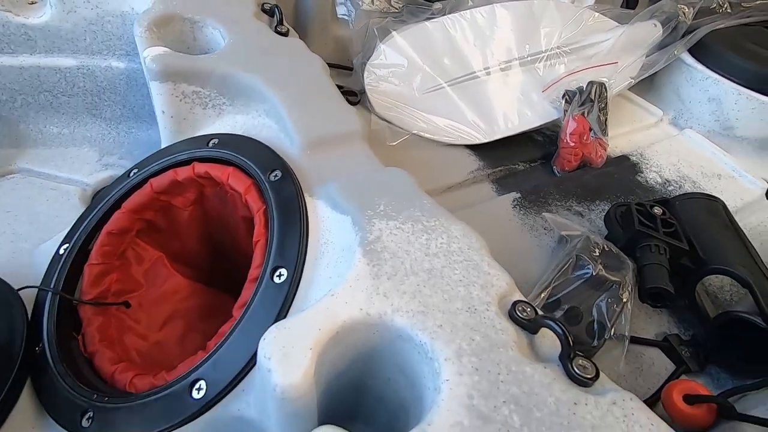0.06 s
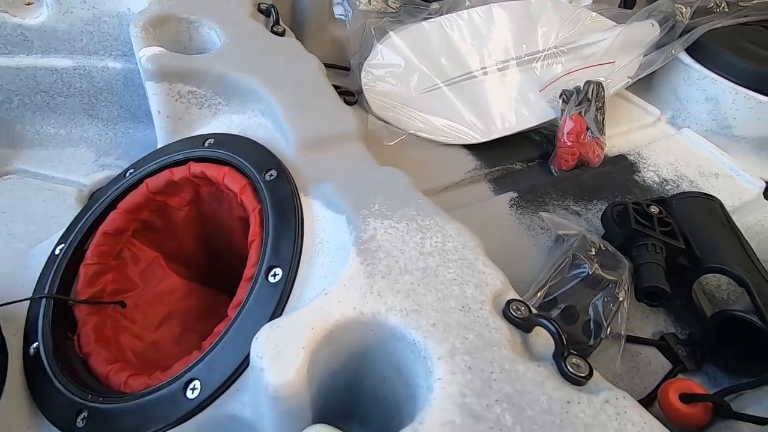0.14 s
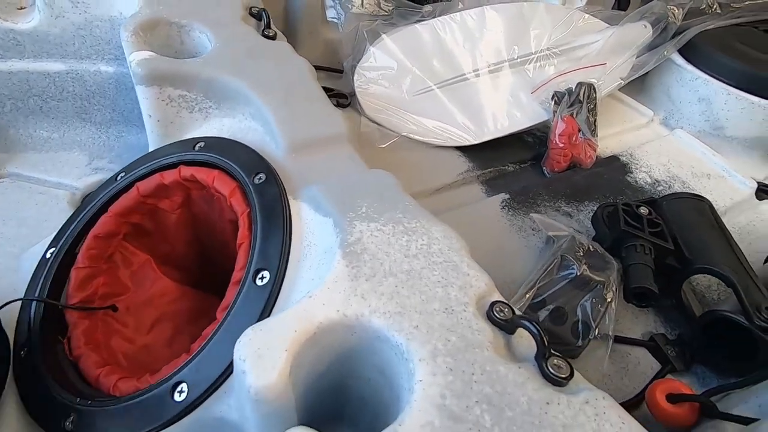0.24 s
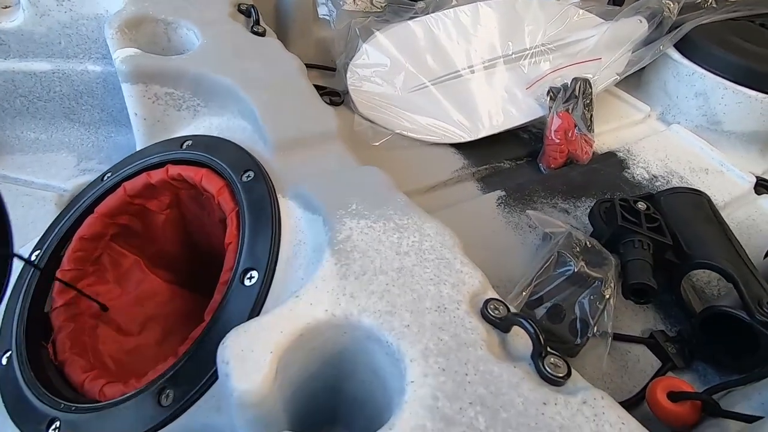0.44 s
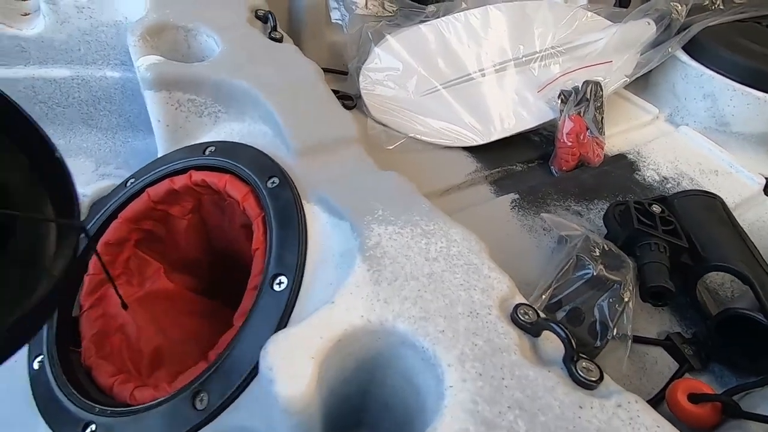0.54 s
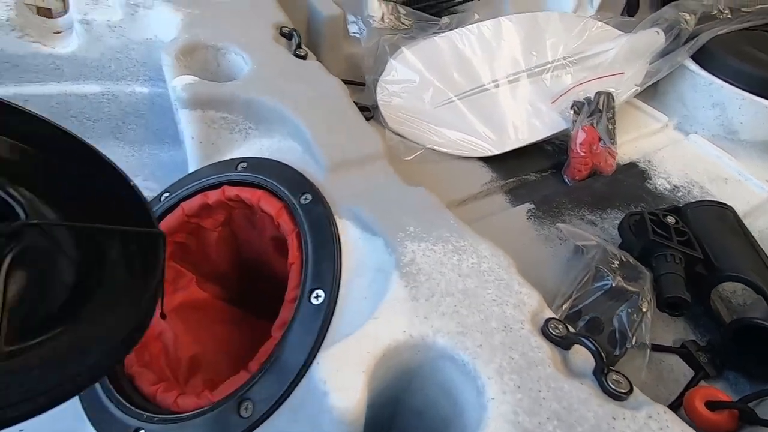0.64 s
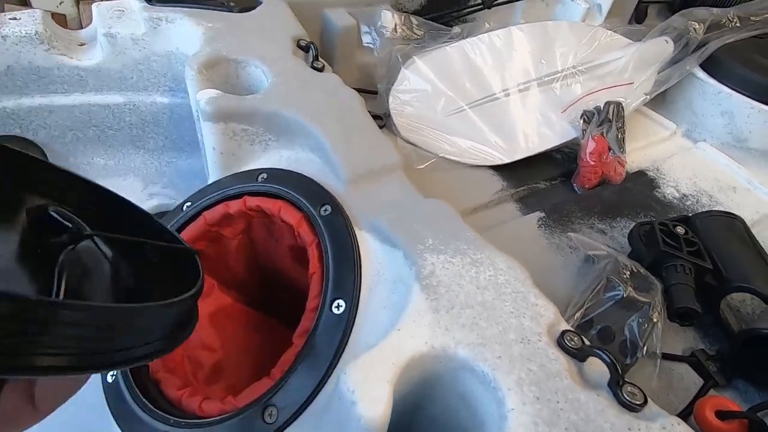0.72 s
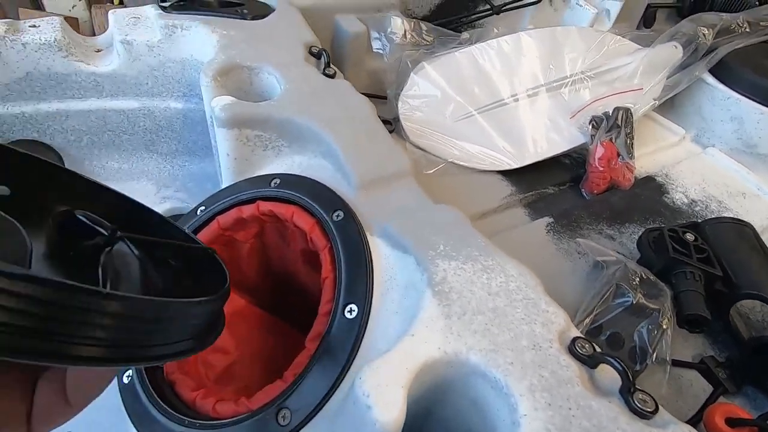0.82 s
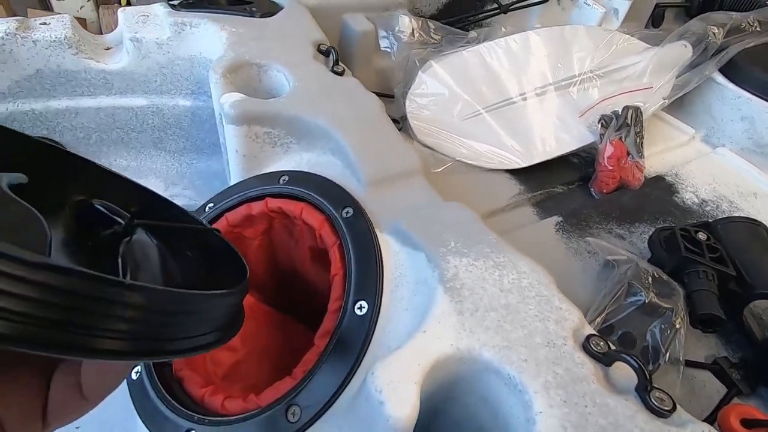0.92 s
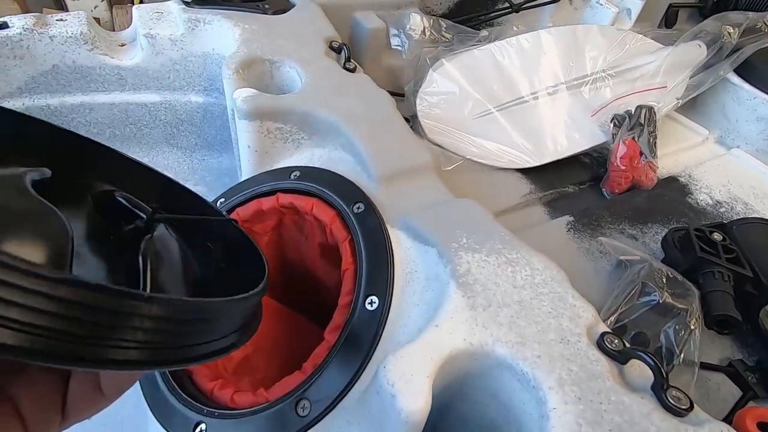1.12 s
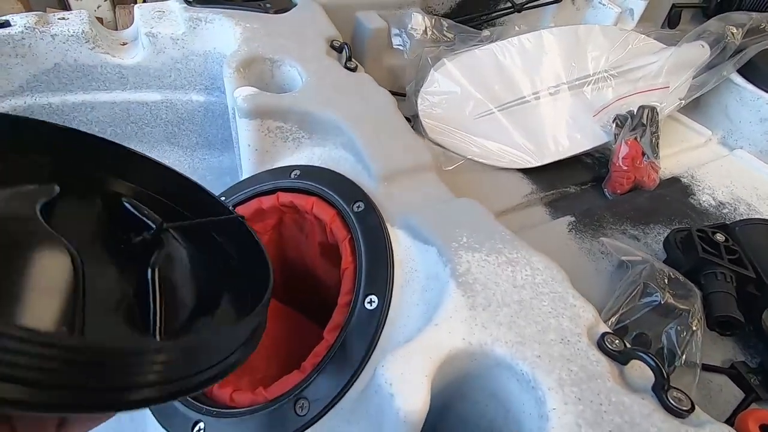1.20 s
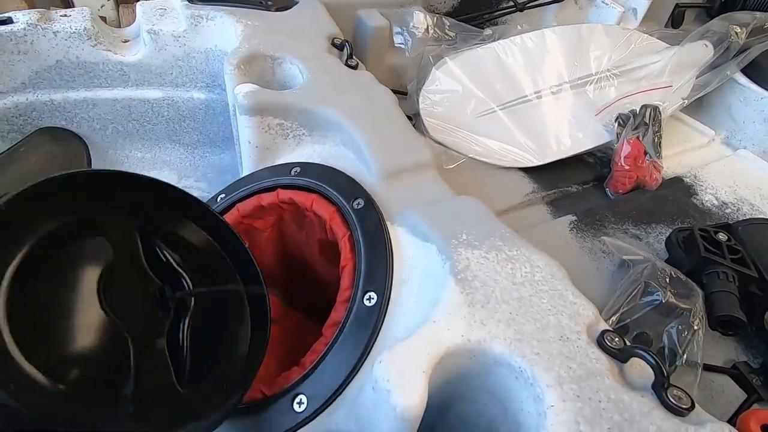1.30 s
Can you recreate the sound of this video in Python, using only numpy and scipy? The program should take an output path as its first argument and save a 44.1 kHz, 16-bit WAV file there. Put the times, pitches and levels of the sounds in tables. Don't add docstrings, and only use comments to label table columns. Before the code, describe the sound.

A plastic hatch lid knocks a hollow kayak hull: faint scrape and thin squeak, a loud dull thud, quick light taps, then soft skin rubbing and small scuffs fading into quiet room noise, heard close.

```python
import sys
import numpy as np
from scipy import signal
from scipy.fft import rfft, irfft
from scipy.io import wavfile
from scipy.ndimage import uniform_filter1d

SR = 44100
rng = np.random.default_rng(int(sys.argv[2]) if len(sys.argv) > 2 else 0)


def wav_record(signal):
    frames = np.transpose(np.atleast_2d(signal))
    bounded = np.clip(frames, -1, 1)
    quanta = np.round(bounded * 32767).astype(np.int16)
    wavfile.write(sys.argv[1], SR, quanta)


def convert_level_to_amplitude(level_db):
    exponent = np.asarray(level_db, float) / 20
    return 10 ** exponent


N = 59535
TIME_S = np.arange(N) / SR


def ramp(table, col, floor=-140):
    a = np.array(table, float)
    return np.interp(TIME_S, a[:, 0], a[:, col], left=floor, right=floor)


def unit(x):
    return x / np.sqrt(np.mean(x ** 2))


def ring(x, hz, t60):
    radius = np.exp(-np.log(1000) / (max(t60, .003) * SR))
    w = 2 * np.pi * hz / SR
    return signal.lfilter([0, np.sin(w)], [1, -2 * radius * np.cos(w), radius ** 2], x)


def soft_ring(x, hz, t60):
    contact_t60_s = .005
    gain = 2 * (1 - np.exp(-np.log(1000) / (contact_t60_s * SR)))
    return gain * ring(ring(x, hz, t60), hz, contact_t60_s)


def coloured(x, points):
    a = np.array(points, float)
    f = np.fft.rfftfreq(N, 1 / SR) + 1
    gain_db = np.interp(np.log(f), np.log(a[:, 0]), a[:, 1])
    return irfft(rfft(x) * convert_level_to_amplitude(gain_db), N)


def grit(rate, spread_db):
    hit = rng.random(N) < rate / SR
    size = rng.exponential(1, N)
    sign = rng.standard_normal(N)
    return unit(hit * convert_level_to_amplitude(spread_db * size) * sign)


def flicker(rate, depth_db):
    k = int(SR / rate)
    wander = uniform_filter1d(uniform_filter1d(rng.standard_normal(N), k), k)
    return convert_level_to_amplitude(depth_db * unit(wander))


# f/Hz, level/dB, T60/s
HULL_MODES = [(121.3, -1.5, 0.11), (182, 2, .035), (240, -2.5, 0.0334), (271, 0, 0.048), (378, 3.5, 0.015),
              (380, -2, 0.05), (500, 2.5, 0.022), (572, -9, .03), (671.3, -5, 0.071), (933, -6, 0.075),
              (1296, 4.5, 0.0071)]
# t/s, level/dB
DRAG = [(0, -38.5), (.02, -43), (.09, -61), (.12, -58), (.18, -52.5), (.195, -36), (.228, -34), (.243, -28),
        (.26, -35), (.32, -45), (.38, -53), (.5, -60.5), (.545, -59.5), (.59, -53), (.635, -58), (.72, -60),
        (.93, -66.5), (1.35, -89)]


def hull_rumble():
    force = convert_level_to_amplitude(ramp(DRAG, 1)) * flicker(70, 1.3)
    rumble = 0
    for hz, db, t60 in HULL_MODES:
        rumble = rumble + convert_level_to_amplitude(db - 27) * ring(grit(2500, 1.5) * force, hz, t60)
    return rumble


# t/s, peak level/dB, contact time/s
THUDS = [
    (.0158, -36, .0015),
    (.197, -32, .002),
    (.2335, -18, .002),
    (.2414, -8.5, .0012),
    (.2702, -26, .0015),
    (.5555, -46, .001),
]


def hull_thuds():
    def bump(start, contact_s):
        return np.exp(-((TIME_S - start) / (contact_s / 2)) ** 2) / (contact_s * SR)

    flex = 2.6
    push = 0
    for start, peak_db, contact_s in THUDS:
        push = push + convert_level_to_amplitude(peak_db) * (bump(start, flex * contact_s) - bump(start, contact_s))
    thump = 4.2 * ring(push, hz=420, t60=.0075)
    modes = sum(convert_level_to_amplitude(db) * ring(push, hz, t60) for hz, db, t60 in HULL_MODES)
    return thump + convert_level_to_amplitude(-19) * modes


def contact_colour_db(hz, octave, tilt, favoured_hz):
    favour_db, favour_octaves = 10, .1
    return tilt * octave + favour_db * np.exp(-(np.log2(hz / favoured_hz) / favour_octaves) ** 2)


# t/s, level/dB, brightness/(dB per octave)
SCRAPE = [(.178, -70.5, 17.5), (.183, -47.5, 2), (.198, -49.5, 7.5), (.218, -27.5, 0.5), (.236, -37, 6.5),
          (.255, -53, -1), (.285, -53.5, 1), (.315, -49, -1.5), (.37, -77.5, 4)]
# start t/s, length/s, level/dB, brightness/(dB per octave), favoured f/Hz
SCUFFS = [(.0, 0.26, -56, 1, 2900), (0.286, 0.0083, -56.5, 6.5, 3900), (0.307, 0.01, -62, -16, 990),
          (0.41, 0.009, -87, -11, 1071), (0.563, 0.09, -60.5, 4, 800), (0.662, 0.05, -66.5, -21, 1071),
          (.687, 0.012, -73.5, 12.5, 3650), (0.82, 0.032, -52.5, 3.5, 1370), (0.856, 0.031, -60, 1.5, 1410),
          (.985, 0.041, -75.5, 6, 3590), (1.272, 0.18, -62, 1.5, 1445)]


def lid_friction(hz, octave, shared_grit, shake):
    scrape_colour_db = contact_colour_db(hz, octave, ramp(SCRAPE, 2, 0), favoured_hz=800)
    envelope = convert_level_to_amplitude(ramp(SCRAPE, 1) + scrape_colour_db)
    for start, length_s, level_db, tilt, favoured_hz in SCUFFS:
        progress = np.clip((TIME_S - start) / length_s, 0, 1)
        stroke = np.sin(np.pi * progress ** .65)
        level = convert_level_to_amplitude(level_db + contact_colour_db(hz, octave, tilt, favoured_hz))
        envelope = envelope + level * stroke
    return envelope * (0.53 * shared_grit + 0.72 * rng.standard_normal(N)) * shake


# t/s, peak level/dB, brightness/(dB per octave), favoured f/Hz
TAPS = [(.1815, -38.5, -7.5, 800), (.399, -47.5, -1, 1076), (0.41, -37, -0.5, 2730),
        (0.4287, -29, -2, 4270), (0.4377, -40, 0, 1100), (0.4652, -41, 4, 3190), (.5132, -51, 1.5, 1380),
        (.5545, -50, 4.5, 800), (.567, -58, 8.5, 4600), (.579, -61, 6.5, 4050), (.7696, -58, 3, 2750),
        (0.828, -61, 9.5, 2900)]


def tap_impulses(hz, octave, sign):
    impulses = np.zeros(N)
    for start, peak_db, tilt, favoured_hz in TAPS:
        scatter_db = 1.5 * rng.standard_normal()
        level_db = peak_db - 7 + contact_colour_db(hz, octave, tilt, favoured_hz) + scatter_db
        impulses[int(start * SR)] = sign * convert_level_to_amplitude(level_db)
    return impulses


# f/Hz, level/dB
CRACK = [(1800, -10.5), (4000, 13), (5500, -0.5), (7000, 1), (9500, -8), (11700, -8.5), (15500, -16.5)]


def contact_crack(shared_grit, shake):
    octave, decay_s = 2.6, .004
    ticks = 0
    for start, peak_db, tilt, _ in TAPS:
        decay = (TIME_S > start) * np.exp(-np.abs(TIME_S - start) / decay_s)
        ticks = ticks + convert_level_to_amplitude(peak_db + tilt * octave) * decay
    tick_noise = convert_level_to_amplitude(5) * ticks * rng.standard_normal(N)
    return convert_level_to_amplitude(-24) * coloured(lid_friction(9000, octave, shared_grit, shake) + tick_noise, CRACK)


# f/Hz, level/dB, T60/s
LID_MODES = [(790, 0, .04), (1071, -3, .025), (1370, -9, .035), (1460, -19, .1), (1631, -13, .025),
             (2750, -16, .035), (2950, -19, .03), (3350, -13, .035), (3700, -12, .025), (4050, -12, .03),
             (4600, -20, .015), (6800, -30, .008)]


def lid():
    shared_grit, shake = grit(3000, 1.6), flicker(160, 0.78)
    out = 0
    for k, (hz, db, t60) in enumerate(LID_MODES):
        octave = np.log2(hz / 1000)
        taps = tap_impulses(hz, octave, sign=(-1) ** k)
        friction = convert_level_to_amplitude(-22.5) * lid_friction(hz, octave, shared_grit, shake)
        out = out + convert_level_to_amplitude(db) * soft_ring(taps + friction, hz, t60)
    return out + contact_crack(shared_grit, shake)


# t/s, level/dB, level/dB of the fine top
RUB = [(0, -69, -101), (.17, -58.5, -104), (.3, -66, -93), (.36, -70, -102), (.5, -66.5, -85.5),
       (.575, -62, -76.5), (.7, -66, -76.5), (.775, -67, -80.5), (.8, -72, -85.5), (.95, -81, -96),
       (1.05, -92, -100)]
# f/Hz, level/(dB per Hz)
RUB_COLOUR = [(880, -4), (1500, -3), (1930, -3.5), (3650, -2), (5450, -9), (6500, -3.5), (8790, -20),
              (12100, -25.5), (15500, -37.5)]
# f/Hz, level/(dB per Hz)
RUB_TOP = [(6000, -22.5), (8500, -2), (11000, -4.5), (13000, -6), (15500, -18)]


def hand():
    grains = grit(8000, 0.99)
    body = unit(coloured(grains, RUB_COLOUR)) * convert_level_to_amplitude(ramp(RUB, 1))
    top = unit(coloured(grains, RUB_TOP)) * convert_level_to_amplitude(ramp(RUB, 2))
    return (body + top) * flicker(60, .8)


# t/s, pitch f/Hz, main line level/dB, other lines level/dB
SQUEAK = [(0, 10300, -90, -82), (.05, 10770, -88, -82), (.074, 11090, -77, -82), (.104, 11760, -75, -83),
          (.124, 11990, -74, -84), (.194, 11770, -75, -87), (.205, 11600, -100, -100)]
# ratio to the main pitch, level/dB
PARTIALS = [(.905, -10), (1.10, -6), (1.14, -6), (1.195, 0), (1.23, -4), (1.27, -8)]
# t/s, pitch f/Hz, level/dB
SPLIT = [(.07, 10700, -100), (.09, 10950, -82), (.135, 10750, -80), (.16, 10250, -83), (.17, 10100, -100)]


def squeak():
    def phase(table):
        return 2 * np.pi * np.cumsum(ramp(table, 1, 11000) * flicker(300, .008)) / SR

    main_phase = phase(SQUEAK)
    main = convert_level_to_amplitude(ramp(SQUEAK, 2)) * flicker(60, 1.5) * np.sin(main_phase)
    others = 0
    for ratio, db in PARTIALS:
        others = others + convert_level_to_amplitude(db) * flicker(60, 1.6) * np.sin(ratio * main_phase)
    others = others * convert_level_to_amplitude(ramp(SQUEAK, 3))
    split = convert_level_to_amplitude(ramp(SPLIT, 2)) * np.sin(phase(SPLIT))
    return 1.13 * (others + main + split)


def room_echo(near):
    t = np.arange(SR // 2) / SR
    t60_s, first_reflection_s = .22, .004
    tail = rng.standard_normal(len(t)) * convert_level_to_amplitude(-60 * t / t60_s) * (t > first_reflection_s)
    return convert_level_to_amplitude(-14) * signal.fftconvolve(near, tail / np.sqrt(np.sum(tail ** 2)))[:N]


# f/Hz, level/(dB per Hz)
ROOM = [(25, 14.5), (60, -4), (220, -5.5), (900, -6.5), (1500, -10), (2300, -15), (3600, -15), (15500, -34)]


def room_noise():
    return unit(coloured(rng.standard_normal(N), ROOM)) * convert_level_to_amplitude(-60.5) * flicker(11, 0.41)


def scene():
    near = hull_rumble() + hull_thuds() + lid() + hand() + squeak()
    return (near + room_echo(near) + room_noise())[None]


def top_cut(x):
    return signal.sosfilt(signal.butter(12, 15660, fs=SR, output="sos"), x)


def record(dry):
    bass_cut = signal.butter(2, 75, "high", fs=SR, output="sos")
    mix = signal.sosfilt(bass_cut, dry)
    return top_cut(mix)


dry = scene()
out = record(dry)
wav_record(out)
```